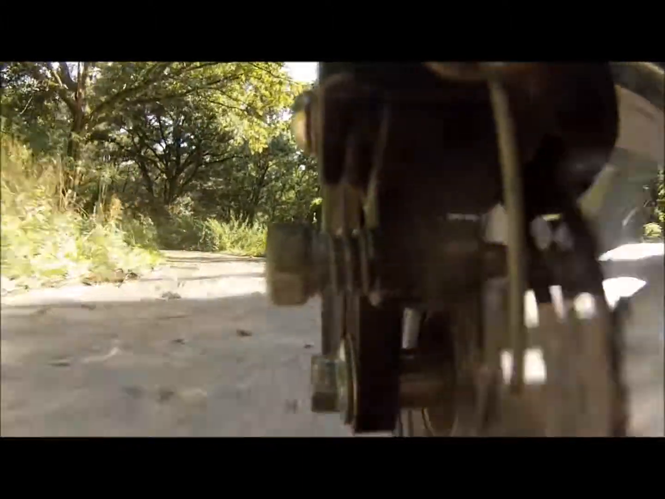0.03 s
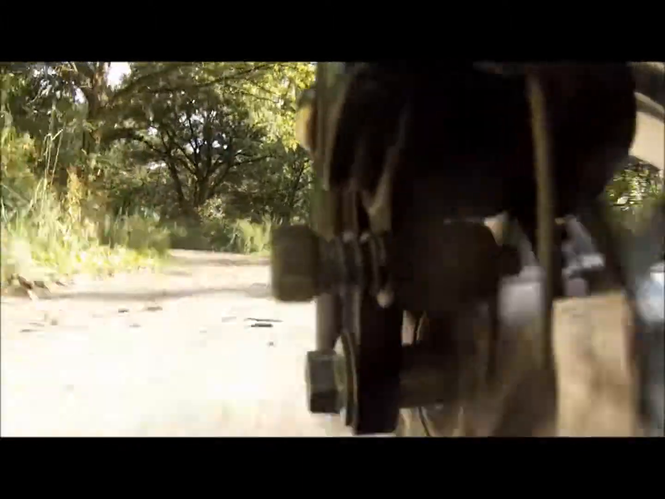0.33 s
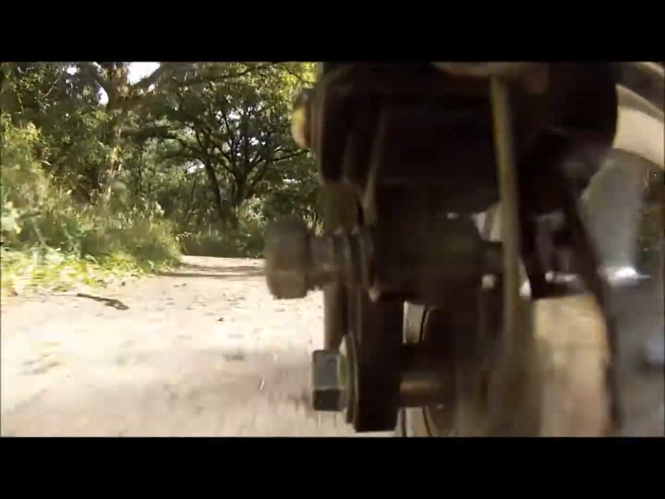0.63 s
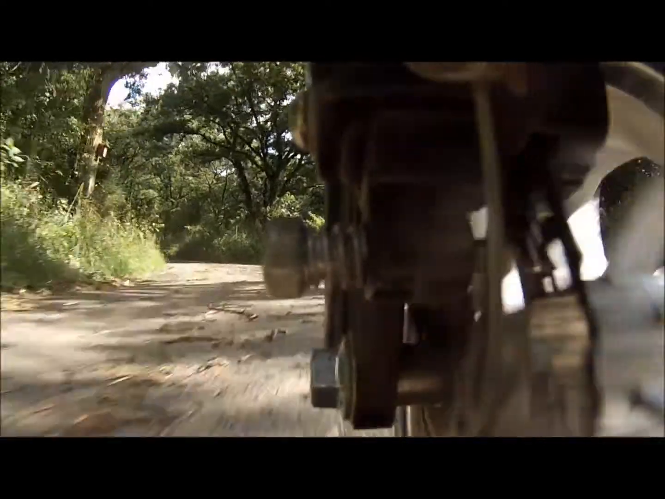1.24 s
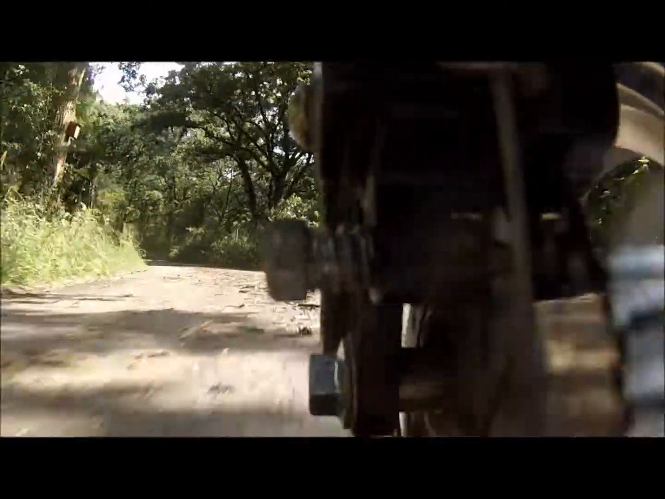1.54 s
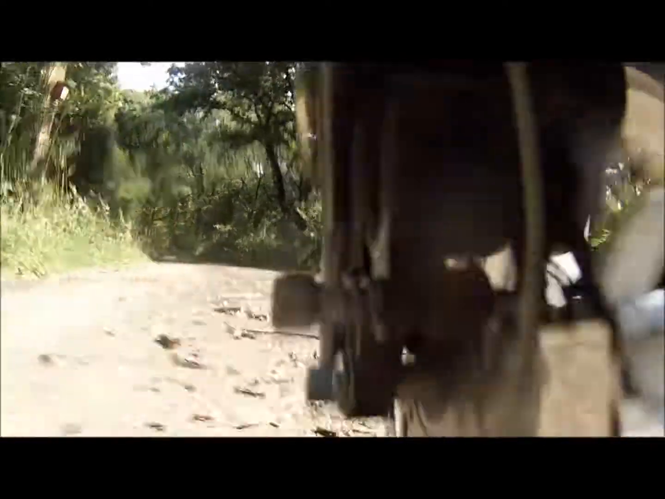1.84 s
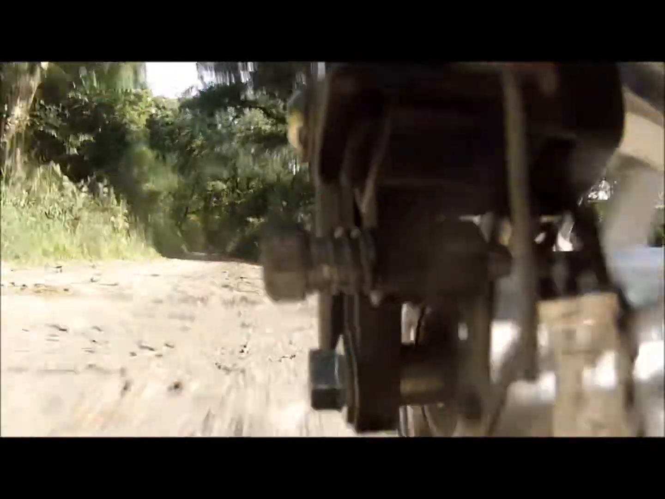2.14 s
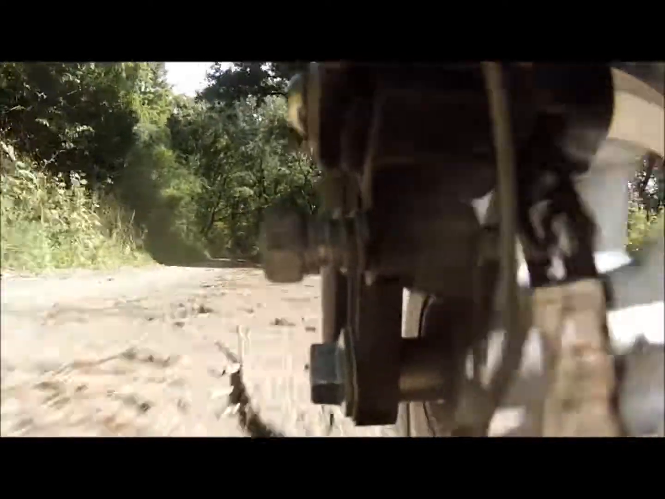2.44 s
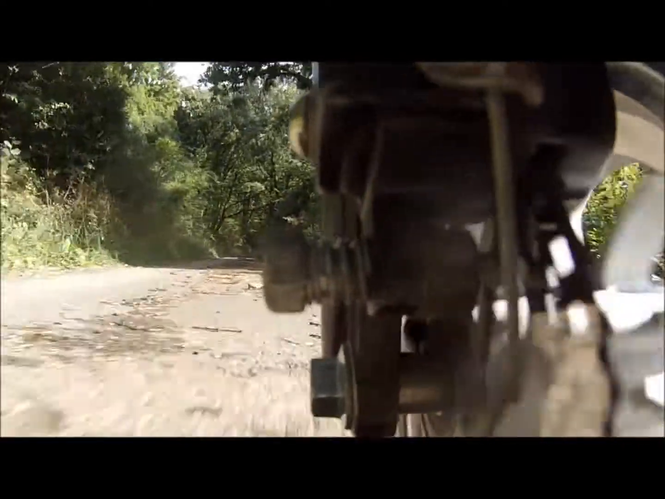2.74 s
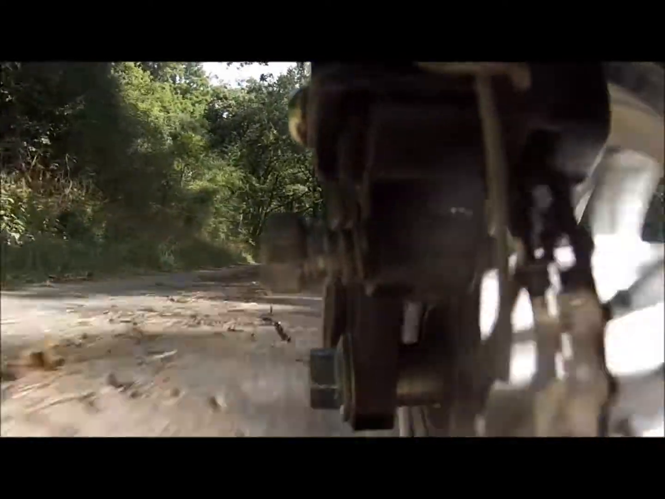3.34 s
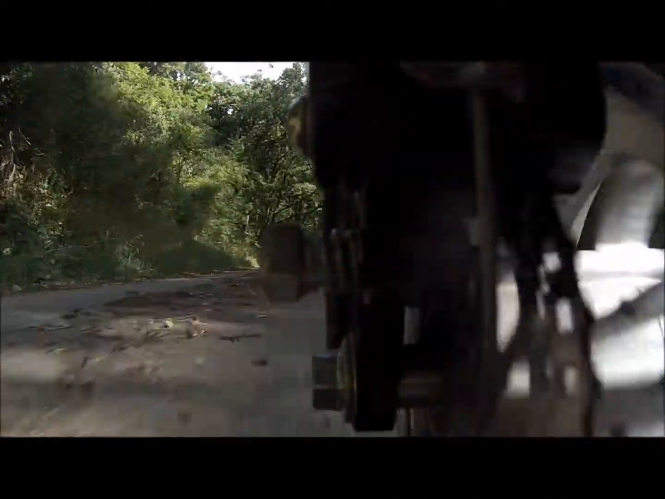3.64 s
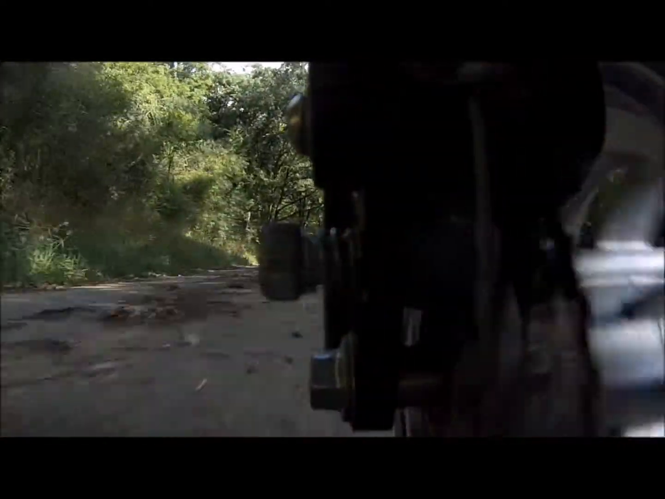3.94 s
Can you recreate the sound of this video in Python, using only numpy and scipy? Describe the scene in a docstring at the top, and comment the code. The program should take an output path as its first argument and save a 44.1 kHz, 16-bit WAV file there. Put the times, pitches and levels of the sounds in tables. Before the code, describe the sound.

A small vehicle rolls along a dirt track throughout, heard close to a wheel, with deep wind buffeting, a dull judder and irregular thumps from ruts. Grit ticks over a sandy tyre hiss. Stones snap against the frame in the first half second, again near 1.3 seconds, then thickly with brief gravel crunches from 1.8 to 3 seconds. The tyre roar and hiss grow a little louder after 3 seconds.

```python
"""Wheels on a woodland track

A small vehicle rolls over dirt, heard from a microphone low on its frame beside a wheel.
Wind buffets the microphone, ruts thump through the frame, and the tyres roar and hiss over sand,
with a faint, patchy sparkle on top. Grit ticks all the way, patches of twigs and gravel crunch,
and single stones snap against the frame."""
import sys
import numpy as np
from scipy import signal
from scipy.fft import rfft, irfft
from scipy.io import wavfile
from scipy.ndimage import map_coordinates

SR = 44100
rng = np.random.default_rng(int(sys.argv[2]) if len(sys.argv) > 2 else 0)


def generate_wav(signal):
    """Clip the signal to [-1, 1] and save it as 16-bit WAV at the path in sys.argv[1]."""
    frames = np.transpose(np.atleast_2d(signal))
    scaled = np.clip(frames, -1, 1) * 32767
    pcm = np.round(scaled).astype(np.int16)
    wavfile.write(sys.argv[1], SR, pcm)


N = 176400

# Table levels are relative: the faders below set each layer's place in the mix.
# gusts on the microphone: time_s, level_db
WIND_GUSTS = [(0, -19.5), (0.1, -13), (0.25, -14), (0.4, -24.5), (0.5, -16.5), (0.58, -21), (0.78, -12),
              (1.05, -19), (1.28, -15), (1.58, -16.5), (1.72, -20), (1.88, -15.5), (2.25, -20),
              (2.6, -18.5), (2.72, -16.5), (2.95, -22.5), (3.35, -15), (3.68, -20.5), (3.77, -13),
              (4, -19.5)]
# rough ground shaking the frame: time_s, level_db
FRAME_SHAKE = [(0, -20), (0.12, -17), (0.2, -19), (0.3, -17), (0.37, -25), (0.46, -21), (0.58, -22),
               (0.85, -18.5), (0.97, -18), (1.07, -20), (1.14, -19), (1.22, -22.5), (1.4, -19.5),
               (1.56, -19), (1.68, -21), (1.89, -16), (2.02, -25), (2.13, -22), (2.26, -30), (2.49, -21),
               (2.64, -21), (2.71, -18), (2.8, -24), (3.02, -19), (3.15, -24), (3.33, -17), (3.52, -20),
               (3.61, -17), (3.68, -23), (3.78, -15), (3.86, -22), (4, -23)]
# ruts that jolt the frame: start_s, level_db
RUTS = [(0.018, -14), (0.099, -16), (0.128, -7.5), (0.504, -8), (0.526, -4), (0.676, -5.5), (0.712, -6),
        (1.145, -3), (1.367, -11), (1.436, -12), (1.592, -6.5), (1.884, -7), (1.899, -6.5), (1.965, -8),
        (2.119, -10), (2.477, -8.5), (2.484, -2.5), (2.704, -7), (2.842, -5), (3.014, -4.5), (3.323, -6),
        (3.349, -7.5), (3.609, -8), (3.773, -2)]
# tyres on the ground: time_s, roar_db, sand_db
TYRE_LEVELS = [(0.0, -40, -47.5), (0.54, -38, -45.5), (0.92, -39, -49), (1.35, -41.5, -46),
               (1.53, -41, -47.5), (1.86, -37.5, -45), (1.99, -41.5, -49), (2.14, -41, -48),
               (2.41, -40, -43.5), (2.6, -35.5, -44.5), (2.83, -37, -44.5), (3.22, -32.5, -41),
               (3.52, -33.5, -39), (3.79, -35, -43.5), (4.0, -35.5, -43)]
# centres of the faint high sparkle: pitch_hz, level_db
SPARKLE_PITCHES = [(8350, 0), (10150, -3.5), (12170, -1), (13300, -7), (14270, -0.5)]
# gravel and twigs under the tyre: middle_s, length_s, level_db
GRAVEL_PATCHES = [(0.189, 0.024, -33), (.265, 0.022, -27.5), (0.503, 0.021, -34), (0.674, 0.038, -38),
                  (1.88, 0.045, -35.5), (1.938, 0.018, -30), (2.158, 0.041, -31), (2.442, 0.029, -35.5),
                  (2.489, 0.0076, -29), (2.578, 0.024, -33), (2.854, 0.024, -33), (3.012, 0.032, -30),
                  (3.4, 0.02, -32)]
# stones and twigs that hit the frame: start_s, level_db, pitch_hz, crack_over_tone_db
STONE_HITS = [(0.2096, -26, 7100, 4), (0.231, -11.5, 2190, -5), (0.2656, -13.5, 5460, -1),
              (0.273, -22, 8300, 9), (0.4171, -11, 5560, 5.5), (0.4857, -22, 3200, 6),
              (0.5764, -21.5, 5960, 8), (0.6668, -22.5, 6700, 12), (0.8575, -26, 4400, 3),
              (1.141, -28, 10000, 14), (1.2985, -25.5, 5570, 6), (1.3391, -18.5, 1910, -2),
              (1.349, -12.5, 7140, 14), (1.805, -23, 9000, 17), (1.847, -19.5, 7650, 9),
              (1.8524, -20.5, 7200, 14), (1.8944, -19, 11200, 10), (1.9017, -8.5, 2580, 1),
              (1.9341, -17.5, 2470, -4), (2.0238, -25, 9500, 14), (2.073, -17.5, 3300, 1.5),
              (2.119, -19.5, 9900, 2), (2.1536, -17.5, 2500, -4), (2.184, -16.5, 4700, 4),
              (2.2011, -19, 4750, 3), (2.273, -25, 9000, 1), (2.3846, -19.5, 6600, 12),
              (2.4247, -15.5, 7130, 3), (2.4901, -19.5, 2000, 5), (2.5384, -13.5, 7340, 3),
              (2.5406, -13, 5500, -2), (2.5738, -13.5, 12500, 8), (2.8542, -11.5, 4540, -5),
              (2.8903, -26, 11000, 10), (3.0042, -20, 5040, 4), (3.0133, -22, 5700, 6),
              (3.023, -19.5, 9100, 3), (3.5515, -24, 6260, 6), (3.6958, -11.5, 6300, -1),
              (3.7373, -20, 2560, 8), (3.7913, -25.5, 7200, 0)]
# rings of the frame under a stone: pitch_hz, width_hz, level_db
FRAME_RINGS = [(3120, 140, 2), (4000, 150, 0), (5720, 160, -2.5), (6900, 180, -2)]
# tone of each source: frequency_hz, gain_db
WIND_EQ = [(12, -9.5), (25, -8), (45, 0.5), (70, -2), (110, -5), (170, -13), (300, -28), (700, -44),
           (2000, -88)]  # deep rumble
SHAKE_EQ = [(30, -15), (80, -6), (150, 1.5), (240, -2.5), (380, -8.5), (550, -14), (800, -21), (1400, -30),
            (2500, -48.5), (6000, -65)]  # dull judder
RUT_EQ = [(30, 1.5), (100, 4), (200, -0.5), (380, -2.5), (600, -9), (1000, -16), (1500, -22.5), (2500, -36),
          (6000, -57)]  # low thump
ROAR_EQ = [(200, -8.5), (700, 4.5), (1400, 0.5), (1750, -4), (2200, -3.5), (2700, -8.5), (3500, -13.5),
           (6000, -33), (15000, -62)]  # midrange rush
SAND_EQ = [(1000, 1), (3000, 2.5), (4500, -1.5), (5200, 1.5), (5800, 4), (7500, -0.5), (8500, -0.5),
           (11500, -3.5), (13600, -5), (15000, -13)]  # bright hiss
GRIT_EQ = [(600, -22), (1500, 10.5), (2300, 5), (3200, -0.5), (4500, 2), (6200, -1), (8500, -0.5),
           (12000, -6), (15000, -8)]  # hard click

# faders
WIND_DB, SHAKE_DB, RUT_DB, ROAR_DB, SAND_DB = 1.5, 1.5, -0.5, 2, -2.5
SPARKLE_DB, GRIT_DB, CRUNCH_DB, STONE_DB = -58, -49, -4, 1

SHAKE_FLUTTER_DB, SAND_FLUTTER_DB = 2, 2.5
RATTLE_DB, RATTLE_DECAY_S = -24, 0.0059
ZINGS_PER_S, ZING_T60_S, ZING_SCATTER_HZ = 260, 0.035, 110
GRAIN_WIDTH, CRACK_WIDTH = 0.27, 2.55  # bandwidths as shares of the pitch
TONE_T60_S, CRACK_T60_S, CHATTER_T60_S, CHATTER_DB = 0.0055, 0.0075, 0.049, -22
FRAME_RING_DB, STRIKE_SPREAD_DB = 2, 2.5


def undb(db):
    """Decibels to gain."""
    return 10 ** (np.asarray(db) / 20)


def unit(x):
    """Scale to rms 1."""
    return x / np.sqrt(np.mean(x ** 2) + 1e-18)


def curve(table, column=1):
    """Gain over time from one dB column of a table."""
    rows = np.array(table)
    return undb(np.interp(np.arange(N) / SR, rows[:, 0], rows[:, column]))


def fade(t, t60_s):
    """A tail that falls 60 dB in t60_s."""
    return np.exp(-np.log(1000) * t / t60_s)


def equalise(x, eq):
    """Minimum-phase EQ, so nothing rings ahead of a hit."""
    size = 8192
    hz, db = np.array(eq).T
    bin_hz = np.arange(size // 2 + 1) * SR / size
    log_gain = np.log(undb(np.interp(np.log(bin_hz + 1), np.log(hz), db)))
    cepstrum = irfft(log_gain)
    cepstrum[1:size // 2] *= 2
    cepstrum[size // 2 + 1:] = 0
    response = irfft(np.exp(rfft(cepstrum)))[:size // 2]
    return signal.fftconvolve(x, response)[:len(x)]


def ring(x, hz, width_hz):
    """One resonance, gain 1 at its centre."""
    return signal.lfilter(*signal.iirpeak(min(hz, SR / 2 - 1), hz / width_hz, fs=SR), x)


def wander(rate_hz):
    """Smooth random drift with rms 1."""
    steps = rng.standard_normal(2048)
    return unit(map_coordinates(steps, [np.arange(N) / SR * rate_hz], order=2, mode="wrap"))


def impacts(per_s, spread_db):
    """Random clicks, many small and a few large."""
    chance, size, sign = rng.random(N), rng.exponential(size=N), rng.choice([-1, 1], N)
    return (chance < per_s / SR) * sign * undb(spread_db * np.minimum(size, 4.5))


def add(out, start_s, sound):
    """Drop a sound into the mix."""
    i = max(int(start_s * SR), 0)
    out[i:i + len(sound)] += sound[:max(N - i, 0)]


def wind():
    """Eddies push on the microphone in quick gusts."""
    return unit(equalise(rng.standard_normal(N), WIND_EQ)) * curve(WIND_GUSTS) * undb(WIND_DB)


def frame_shake(ground):
    """Countless small bumps judder through the damped frame."""
    bumps = equalise(impacts(per_s=700, spread_db=2.5), SHAKE_EQ)
    return unit(bumps * undb(SHAKE_FLUTTER_DB * ground)) * curve(FRAME_SHAKE) * undb(SHAKE_DB)


def rut_thumps():
    """Each rut deals the frame one hard blow with a short rattle behind it."""
    out, t = np.zeros(N), np.arange(SR // 10) / SR
    for start_s, db in RUTS:
        blow = undb(RATTLE_DB) * rng.standard_normal(len(t)) * np.exp(-t / RATTLE_DECAY_S)
        blow[0] = 1  # the hit itself
        thump = equalise(blow, RUT_EQ)
        add(out, start_s, -thump / np.abs(thump).max() * undb(db + RUT_DB))
    return out


def tyres(ground):
    """The tread roars on the dirt and sprays a fluttering hiss of fine sand."""
    roar = unit(equalise(impacts(per_s=5000, spread_db=3.6), ROAR_EQ))
    roar *= curve(TYRE_LEVELS, column=1)
    spray = equalise(impacts(per_s=9000, spread_db=0.5), SAND_EQ)
    flutter = undb(SAND_FLUTTER_DB * unit(ground + wander(rate_hz=90)))
    sand = unit(spray * flutter) * curve(TYRE_LEVELS, column=2)
    return roar * undb(ROAR_DB) + sand * undb(SAND_DB)


def high_sparkle():
    """A faint, patchy high sparkle of short, slightly detuned zings that swells with the sand hiss."""
    out, t = np.zeros(N), np.arange(SR // 10) / SR
    for hz, db in SPARKLE_PITCHES:
        for when, detune, size in rng.random((int(ZINGS_PER_S * N / SR), 3)):
            pitch_hz = hz + ZING_SCATTER_HZ * (2 * detune - 1)
            zing = np.sin(2 * np.pi * pitch_hz * t) * fade(t, ZING_T60_S)
            add(out, when * N / SR, undb(db) * size ** 3 * zing)
    return unit(out * curve(TYRE_LEVELS, column=2) ** 1.2) * undb(SPARKLE_DB)


def grains(per_s, spread_db):
    """Grains of six sizes strike, each size ticking at its own pitch."""
    pitches_hz = np.geomspace(2300, 12500, num=6)
    ticks = np.zeros(N)
    for hz in pitches_hz:
        hits = impacts(per_s / len(pitches_hz), spread_db)
        ticks += ring(hits, hz, hz * GRAIN_WIDTH) / np.sqrt(hz)
    return unit(equalise(ticks, GRIT_EQ))


def grit():
    """Lone grains tick all the way, louder on sandy ground; in patches they crowd into a crunch."""
    ticks = unit(grains(per_s=300, spread_db=4) * np.sqrt(curve(TYRE_LEVELS, column=2)))
    t = np.arange(N) / SR
    swells = sum(undb(db) * np.exp(-2 * ((t - middle_s) / length_s) ** 2)
                 for middle_s, length_s, db in GRAVEL_PATCHES)
    crunch = grains(per_s=3200, spread_db=5.5) * swells
    return ticks * undb(GRIT_DB) + crunch * undb(CRUNCH_DB)


def stones():
    """Each stone snaps with a tiny tone, a broad crack and a brief chatter; the frame rings after it."""
    out, t = np.zeros(N), np.arange(SR // 20) / SR
    contact_fade = fade(t, CRACK_T60_S) + undb(CHATTER_DB) * fade(t, CHATTER_T60_S)
    for start_s, db, hz, crack_db in STONE_HITS:
        contact = equalise(rng.standard_normal(len(t)) * contact_fade, GRIT_EQ)
        crack = unit(ring(contact, hz, min(hz * CRACK_WIDTH, SR / 3)))
        tone = unit(np.sin(2 * np.pi * hz * t) * fade(t, TONE_T60_S))
        snap = tone + undb(crack_db) * crack
        # every stone strikes a different spot, so the balance of the rings shifts
        rings = sum(undb(ring_db + STRIKE_SPREAD_DB * rng.standard_normal()) * ring(snap, ring_hz, width)
                    for ring_hz, width, ring_db in FRAME_RINGS)
        hit = unit(snap + undb(FRAME_RING_DB) * rings) / tone.max()
        add(out, start_s, hit * undb(db + STONE_DB))
    return out


def scene():
    """Mono mix; the same uneven ground makes the frame's shake and the sand hiss flutter together."""
    ground = wander(rate_hz=55)
    bed = wind() + frame_shake(ground) + rut_thumps() + tyres(ground)
    return (bed + high_sparkle() + grit() + stones())[None]


def record(dry):
    """Soft saturation rounds the loudest peaks and a steep low-pass cuts the top."""
    ceiling, top_hz = 1.2, 15400
    rounded = ceiling * np.tanh(dry / ceiling)
    return signal.sosfilt(signal.ellip(10, .2, 80, top_hz, fs=SR, output="sos"), rounded)


dry = scene()
out = record(dry)
generate_wav(out)
```